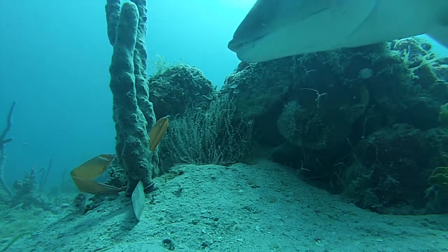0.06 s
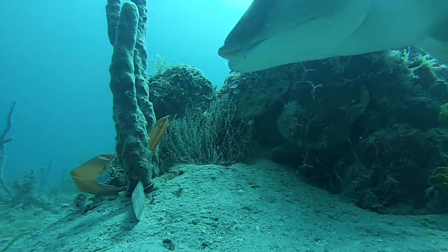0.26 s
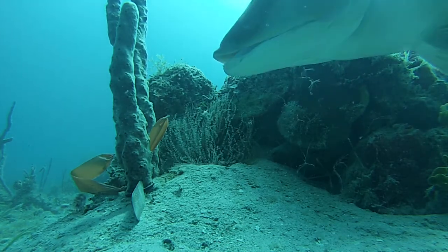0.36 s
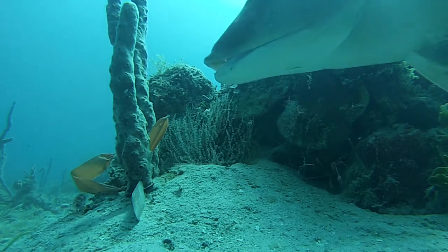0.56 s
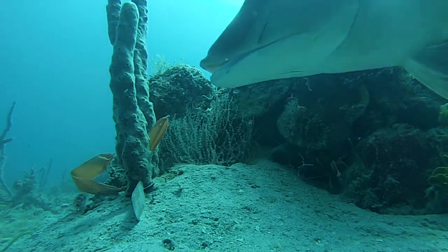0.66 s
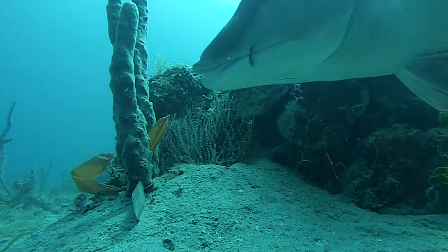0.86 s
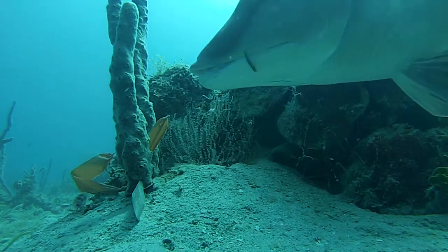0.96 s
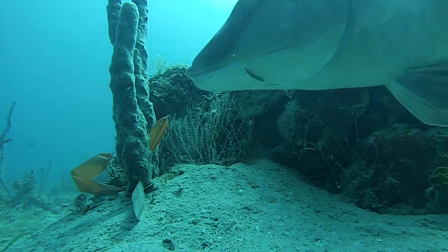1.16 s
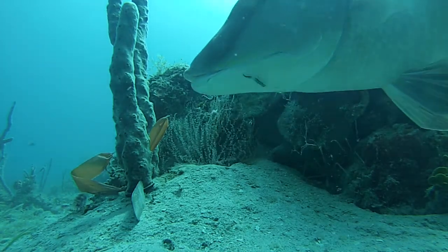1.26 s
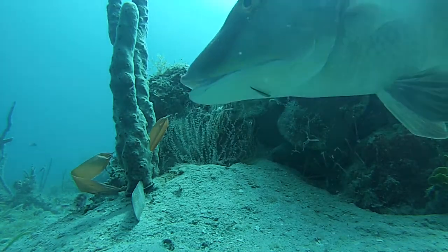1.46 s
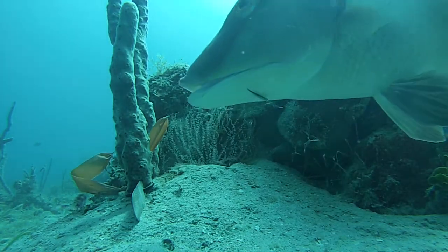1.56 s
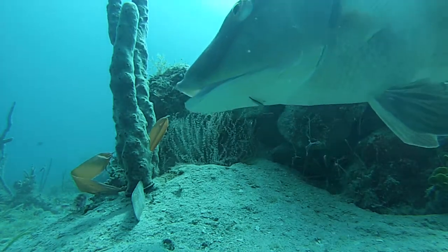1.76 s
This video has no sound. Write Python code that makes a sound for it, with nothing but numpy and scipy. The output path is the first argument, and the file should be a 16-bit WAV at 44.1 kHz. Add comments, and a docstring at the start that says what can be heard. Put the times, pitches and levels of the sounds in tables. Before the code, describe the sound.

Snapping shrimp on a reef, heard inside an underwater camera housing, make a steady fizzing crackle over soft water rumble for nearly two seconds. Irregular dry snaps stand out throughout; one very loud, close snap rings briefly at 0.2 s. Tiny hollow pings come near 0.33, 0.82, 1.3 and 1.6 s, a dull double knock at 0.74 s. A faint rough hum swells, rising, around 0.1, 0.45 and 1.0 s.

```python
"""Snapping shrimp on a reef

Underwater, with the microphone inside a camera housing: water rumbles and far snaps merge into a haze.
Nearby snaps stand out all around and one comes from very close; each is a pulse that rings the housing
for a few ms, plus a crack of decaying noise. Four soft pings and two dull knocks are short resonances.
A faint low hum, four harmonics with a rough flutter, swells three times, rising in pitch."""
import sys
import numpy as np
from scipy import signal
from scipy.fft import rfft, irfft, next_fast_len
from scipy.io import wavfile
from scipy.ndimage import map_coordinates

SR = 44100
rng = np.random.default_rng(int(sys.argv[2]) if len(sys.argv) > 2 else 0)


def dump_mix(stems):
    """Bounce the given channels to the path in sys.argv[1] as a 16-bit WAV at rate SR."""
    frames = np.atleast_2d(stems).T  # one column per channel
    limited = np.clip(frames, -1, 1)  # hard clip at full scale
    pcm = np.round(limited * 32767).astype(np.int16)
    wavfile.write(sys.argv[1], SR, pcm)


N = 79380  # samples, 1.8 s

# Noise colours; each noise is brought to rms 1 before its own level is applied.
# Rumble of the water: f/Hz, relative level/dB
WATER_SPECTRUM = [(20, -3.5), (45, 3), (80, -2.5), (160, -4), (300, -8), (450, -10), (800, -12.5),
                  (1500, -18), (3000, -28.5), (8000, -59)]
# Fizz of the farthest shrimp: f/Hz, relative level/dB
HAZE_SPECTRUM = [(500, -10.5), (1200, -9.5), (1900, -0.5), (2400, 3), (3300, -4), (4100, -4), (5700, -5),
                 (7100, -5), (9500, -12), (12000, -16.5), (15000, -19.5), (16500, -34)]
# Faint hiss, opposite in the two channels: f/Hz, relative level/dB
SIDE_HISS_SPECTRUM = [(60, -44), (300, -6.5), (1000, -7), (2500, -9), (4500, -3.5), (7500, -9.5),
                      (10000, -13.5), (13000, -34)]
# Rough low flutter around the hum: f/Hz, relative level/dB
FLUTTER_SPECTRUM = [(40, -17), (90, -8), (280, 4), (400, -40), (600, -1.5), (1200, -48)]
WATER_DB, HAZE_DB, SIDE_HISS_DB, FLUTTER_DB = -55.5, -64.5, -80, -64
HAZE_PATCHY_DB, HAZE_PATCHES_PER_S = 1.23, 90

# Resonances of the camera housing and the valleys between them: f/Hz, level/dB
HOUSING_RESPONSE = [(380, -15), (700, -4.5), (960, 11), (1220, 7), (1350, 1.5), (1560, 20), (1820, 1),
                    (2080, 13), (2310, 26), (2650, 21), (2880, 11), (3320, 25.5), (3850, 13), (4170, -4.5),
                    (4450, 16), (4800, 17.5), (5280, -3), (5600, 6), (6000, -32.5), (6550, 10),
                    (6950, 15.5), (7400, 8), (8500, 7), (9400, -7.5), (10100, -12), (11000, 1.5),
                    (11800, 1.5), (13100, -5), (13800, -26), (14900, -6), (16500, -41)]
SMEAR_HZ, SMEAR_RADIUS = 2800, 0.81  # all-pass that spreads the ring in time
# Broad crack of a snap, brought to unit energy before its level: f/Hz, relative level/dB
CRACK_SPECTRUM = [(300, -49), (900, -42), (1600, -6.5), (2400, 15), (3300, 5.5), (4100, -2), (5000, 3),
                  (7500, 3), (10000, -20), (15000, -43)]
CRACK_T60_S, BUBBLE_LOW_HZ = 0.0087, 403
PIVOT_HZ = 3240  # brightness tilts about here

# Scatter off the coral
REEF_DB, REEF_T60_S = -9.5, 0.041
# Far snaps: rate over all colonies, rms level, spread of sizes
FAR_PER_S, FAR_DB, FAR_SPREAD_DB = 170, -67, 4.5
# Far snaps: mean brightness in dB per octave, its spread between colonies, crack level
FAR_TILT_DB, FAR_TILT_SPREAD_DB, FAR_CRACK_DB = 3.5, 2, 9

# Nearby snaps: t/s, level/dB, brightness/(dB per octave)
NEAR_SNAPS = [(.0560, -42, -5.5), (0.114, -45, 3), (0.1352, -44.5, 6.5), (.1488, -45.5, 5.5),
              (.1690, -53, -4), (0.2568, -54, 12), (0.2795, -53.5, -6), (0.3036, -56, 6),
              (0.3618, -43.5, 3.5), (0.4836, -46, -1), (0.4906, -42.5, 1), (0.5591, -40.5, -2.5),
              (.6680, -42, -5.5), (.7330, -49.5, 7.5), (0.7663, -64, 10), (0.8457, -50.5, -8),
              (0.8493, -38.5, -8.5), (0.859, -40.5, 4), (0.9401, -44.5, 1), (1.1628, -41, -5.5),
              (1.228, -57, -5), (1.361, -38, 0), (1.3834, -49, 3.5), (1.4542, -43, -10), (1.6520, -53, 9),
              (1.7155, -49.5, 8), (1.7858, -40.5, -1.5)]
NEAR_CRACK_DB = 14

# Swells of the hum: start t/s, length t/s, first f/Hz, last f/Hz, level/dB of harmonics 1, 2, 3, 4
HUM_SWELLS = [(.06, .37, 39, 55, -72, -62, -66, -66), (.44, .25, 68, 85, -61, -59, -66, -72),
              (.98, .40, 77, 99.5, -58, -65, -61, -76)]
HUM_FADE_S, HUM_GLIDE_POWER = .05, 2.4
HUM_WAVER_DB, HUM_WAVER_PER_S = 1.5, 13.26
HUM_JITTER, HUM_JITTER_PER_S = .006, 27.7  # jitter as a fraction of the pitch

# The snap right by the camera
CLOSE_S, CLOSE_DB, CLOSE_CRACK_DB = .2038, -3.5, -1.5
# Its echoes off the reef and the surface: delay t/s, level/dB
CLOSE_ECHOES = [(.0062, -47), (0.0093, -24)]
ECHO_TOP_HZ = 4000

# Soft pings: t/s, f/Hz, level/dB
SOFT_PINGS = [(.3345, 2390, -38.5), (.8163, 2280, -37.5), (1.3055, 2240, -45), (1.5965, 2380, -39)]
PING_T60_S, PING_ATTACK_S = .015, .0008

# Dull knocks: t/s, level/dB
DULL_KNOCKS = [(.7360, -45), (.7407, -33)]
# What the knocks ring with, before the scatter of levels: f/Hz, level/dB, t60 t/s
KNOCK_RESONANCES = [(715, -27, 0.015), (1033, -4, 0.017), (1143, -10, 0.033), (1554, 0.5, .016),
                    (1820, -19, 0.022), (2257, 0, 0.021), (2700, -10.5, 0.01), (3150, -11.5, 0.027)]
MODE_SCATTER_DB, KNOCK_ATTACK_S = 3.5, 0.00023

TOP_HZ = 15300  # middle of the camera's upper band edge


def amp(db):
    """Decibels to gain."""
    return 10 ** (np.asarray(db) / 20)


def unit(x):
    """Scale to rms 1."""
    return x / np.sqrt(np.mean(x ** 2) + 1e-20)


def filtered(x, response):
    """Multiply the spectrum of x by a response of frequency."""
    m = next_fast_len(N + 8192)
    hz = np.fft.rfftfreq(m, 1 / SR)
    return irfft(rfft(x, m) * response(hz), m)[:N]


def noise(spectrum):
    """Noise of rms 1, its colour drawn straight between points on a log-frequency axis."""
    f, db = np.transpose(spectrum)
    white = rng.standard_normal(N)
    return unit(filtered(white, lambda hz: amp(np.interp(np.log(hz + 1), np.log(f), db))))


def wobble(rate):
    """A smooth random curve, rate knots a second."""
    knots = rng.standard_normal(int(N * rate / SR) + 4)
    return map_coordinates(knots, [np.arange(N) * rate / SR])


def add(track, s, sound):
    """Mix a sound into the track at a time in seconds."""
    part = track[max(round(s * SR), 0):][:len(sound)]
    part += sound[:len(part)]


def fade(t, t60):
    """Exponential decay by 60 dB in t60 seconds."""
    return np.exp(-np.log(1000) * t / t60)


def water():
    """Low rumble of the sea as steady coloured noise."""
    return amp(WATER_DB) * noise(WATER_SPECTRUM)


def haze():
    """The farthest shrimp fuse into a fizz of noise whose level is patchy."""
    level_db = HAZE_DB + HAZE_PATCHY_DB * wobble(HAZE_PATCHES_PER_S)
    return amp(level_db) * noise(HAZE_SPECTRUM)


def side_hiss():
    """Faint noise that sets the two channels apart."""
    return amp(SIDE_HISS_DB) * noise(SIDE_HISS_SPECTRUM)


def off_coral(sound):
    """The direct sound and its brief scatter from the reef, a decaying burst of random reflections."""
    t = np.arange(SR // 10) / SR
    path = rng.standard_normal(len(t)) * fade(t, REEF_T60_S)
    path *= amp(REEF_DB) / np.linalg.norm(path)
    path[0] = 1  # direct path
    return signal.fftconvolve(sound, path)


def housing(tilt_db, size=2048):
    """A sharp pulse rings the housing's resonances, weighted by its direction and slightly smeared."""
    f, db = np.transpose(HOUSING_RESPONSE)
    hz = np.fft.rfftfreq(size, 1 / SR) + 1
    tilted_db = db + tilt_db * np.log2(f / PIVOT_HZ)
    gain = amp(np.interp(np.log(hz), np.log(f), tilted_db))
    # Folding the cepstrum gives minimum phase: the ring starts at once
    cepstrum = irfft(np.log(gain))
    cepstrum[1:size // 2] *= 2
    cepstrum[size // 2 + 1:] = 0
    pulse = irfft(np.exp(rfft(cepstrum)))
    poles = [1, -2 * SMEAR_RADIUS * np.cos(2 * np.pi * SMEAR_HZ / SR), SMEAR_RADIUS ** 2]
    return signal.lfilter(poles[::-1], poles, pulse)


def snap(tilt_db, crack_db):
    """One collapsing bubble: the ring of the housing and a broad, random crack."""
    rung = housing(tilt_db)
    t = np.arange(len(rung)) / SR
    hz = np.fft.rfftfreq(len(rung), 1 / SR) + 1
    f, db = np.transpose(CRACK_SPECTRUM)
    tilted_db = db + tilt_db * np.log2(f / PIVOT_HZ)
    colour = amp(np.interp(np.log(hz), np.log(f), tilted_db))
    crack = irfft(rfft(rng.standard_normal(len(t))) * colour) * fade(t, CRACK_T60_S)
    crack /= np.linalg.norm(crack)
    low_cut = signal.butter(2, BUBBLE_LOW_HZ, "highpass", fs=SR, output="sos")
    return signal.sosfilt(low_cut, rung + amp(crack_db) * crack)


def far_snaps(count=16):
    """Colonies of shrimp, each with its own colour, snapping at random."""
    out = np.zeros(N)
    for _ in range(count):
        fired = rng.random(N) < FAR_PER_S / count / SR
        # The cap keeps any one far snap from standing out
        sizes = amp(FAR_SPREAD_DB * np.minimum(rng.standard_normal(N), 2))
        tilt_db = FAR_TILT_DB + FAR_TILT_SPREAD_DB * rng.standard_normal()
        colony_snap = unit(off_coral(snap(tilt_db, FAR_CRACK_DB)))
        out += signal.fftconvolve(fired * sizes, colony_snap)[:N]
    return amp(FAR_DB) * unit(out)


def near_snaps():
    """Single bubble collapses that stand out of the haze, each scattered by the reef."""
    out = np.zeros(N)
    for s, db, tilt_db in NEAR_SNAPS:
        add(out, s, amp(db) * off_coral(snap(tilt_db, NEAR_CRACK_DB)))
    return out


def hum():
    """Low harmonic swells whose pitch rises and levels off, with a rough flutter around them."""
    t, out = np.arange(N) / SR, np.zeros(N)
    for start, length, first_hz, last_hz, *levels in HUM_SWELLS:
        progress = np.clip((t - start) / length, 0, 1)
        glide_hz = last_hz + (first_hz - last_hz) * (1 - progress) ** HUM_GLIDE_POWER
        hz = glide_hz * (1 + HUM_JITTER * wobble(HUM_JITTER_PER_S))
        phase = 2 * np.pi * np.cumsum(hz) / SR
        tone = np.zeros(N)
        for harmonic, db in enumerate(levels, 1):
            gain = amp(db + HUM_WAVER_DB * wobble(HUM_WAVER_PER_S))
            tone += np.sqrt(2) * gain * np.sin(harmonic * phase)
        flutter = amp(FLUTTER_DB) * noise(FLUTTER_SPECTRUM)
        to_edge_s = np.minimum(progress, 1 - progress) * length
        out += np.clip(to_edge_s / HUM_FADE_S, 0, 1) * (tone + flutter)
    return out


def close_snap():
    """A shrimp right by the camera rings the housing hard; two weak, duller echoes follow."""
    out = np.zeros(N)
    blow = amp(CLOSE_DB) * snap(0, CLOSE_CRACK_DB)
    add(out, CLOSE_S, blow)
    dulled = signal.sosfilt(signal.butter(1, ECHO_TOP_HZ, fs=SR, output="sos"), blow)
    for delay, db in CLOSE_ECHOES:
        add(out, CLOSE_S + delay, amp(db) * off_coral(dulled))
    return out


def pings():
    """Small hollow pings, each one short resonance scattered by the reef."""
    out, t = np.zeros(N), np.arange(SR // 20) / SR
    envelope = fade(t, PING_T60_S) * (1 - np.exp(-t / PING_ATTACK_S))
    for s, hz, db in SOFT_PINGS:
        ping = np.sin(2 * np.pi * hz * t) * envelope
        add(out, s, amp(db) * off_coral(ping))
    return out


def ring(modes):
    """Modes set ringing by one knock, a little different every time."""
    t = np.arange(SR // 20) / SR
    hz, db, t60 = np.transpose(modes)[:, :, None]
    gains = amp(db + MODE_SCATTER_DB * rng.standard_normal(hz.shape))
    decaying = gains * np.cos(2 * np.pi * hz * t) * fade(t, t60)
    return np.sum(decaying, axis=0) * (1 - np.exp(-t / KNOCK_ATTACK_S))


def knocks():
    """Dull knocks, each a cluster of decaying modes scattered by the reef."""
    out = np.zeros(N)
    for s, db in DULL_KNOCKS:
        add(out, s, amp(db) * off_coral(ring(KNOCK_RESONANCES)))
    return out


def scene():
    """Both channels hear nearly the same through the housing."""
    background = water() + haze() + far_snaps()
    mono = background + near_snaps() + hum() + close_snap() + pings() + knocks()
    side = side_hiss()
    return np.array([mono + side, mono - side])


def record(dry):
    """The camera keeps nothing above its band limit, a straight 600 Hz wide slope."""
    def band_limit(hz):
        return np.clip((TOP_HZ - hz) / 600 + .5, 0, 1)
    return np.array([filtered(channel, band_limit) for channel in dry])


dry = scene()
out = record(dry)
dump_mix(out)
```